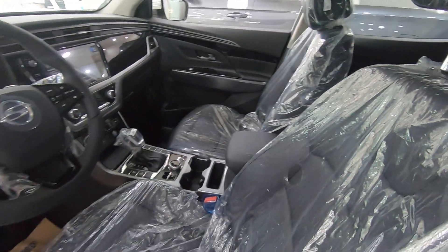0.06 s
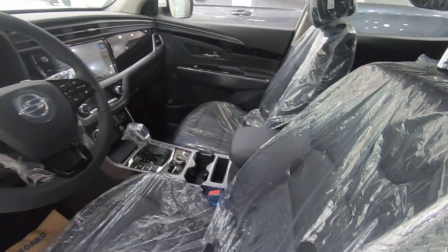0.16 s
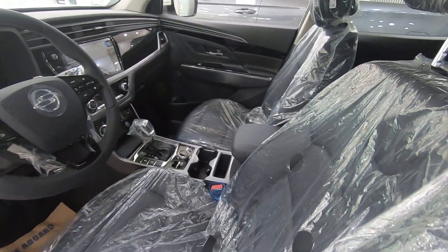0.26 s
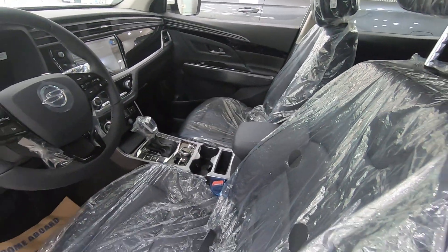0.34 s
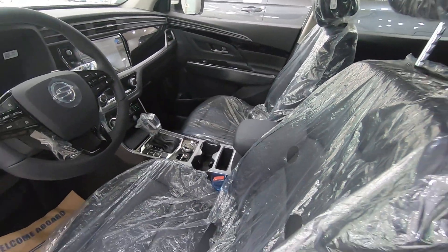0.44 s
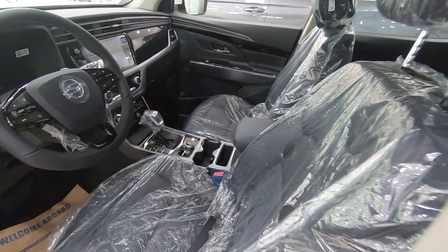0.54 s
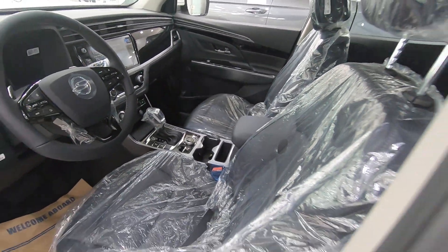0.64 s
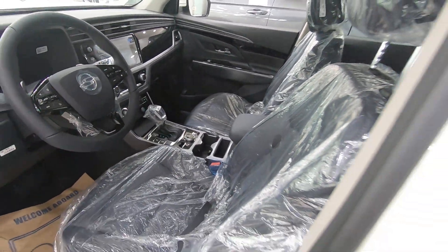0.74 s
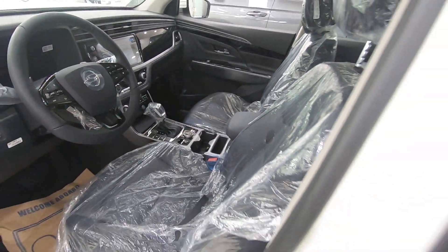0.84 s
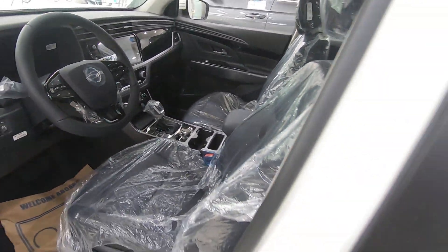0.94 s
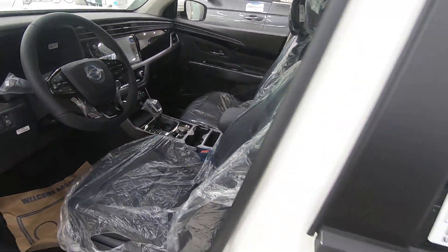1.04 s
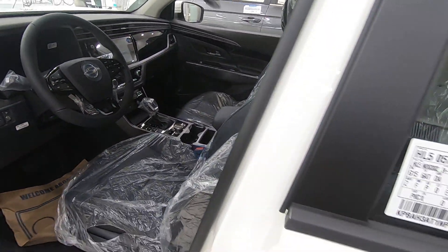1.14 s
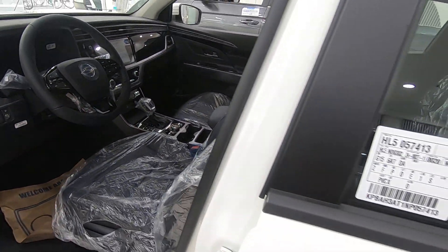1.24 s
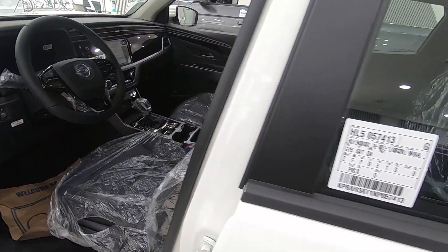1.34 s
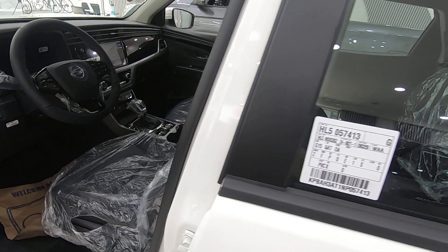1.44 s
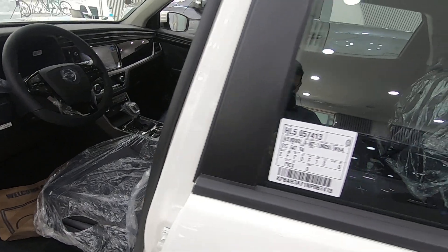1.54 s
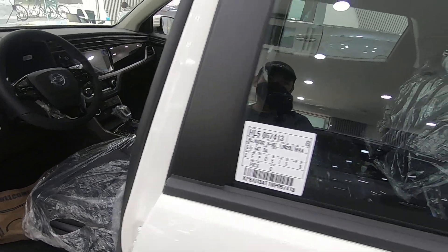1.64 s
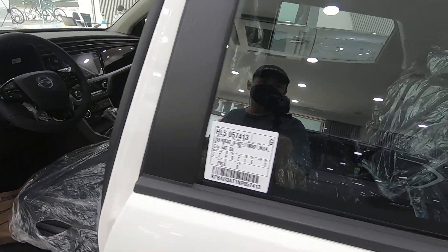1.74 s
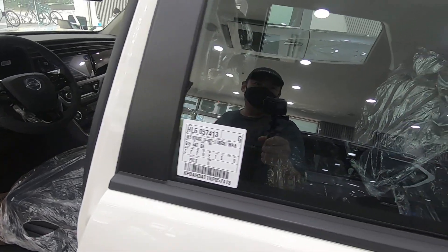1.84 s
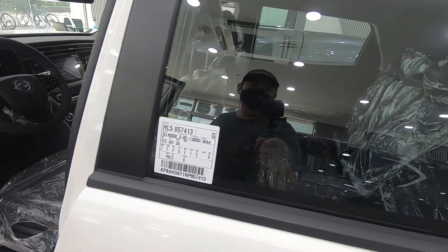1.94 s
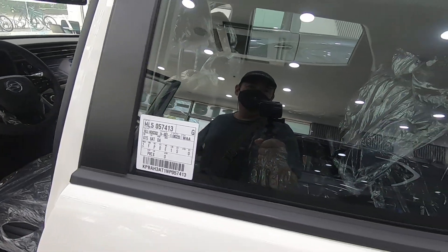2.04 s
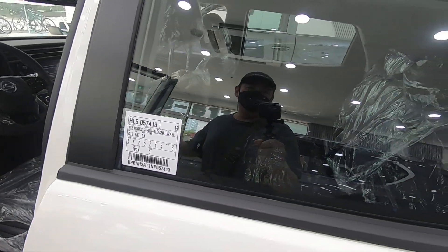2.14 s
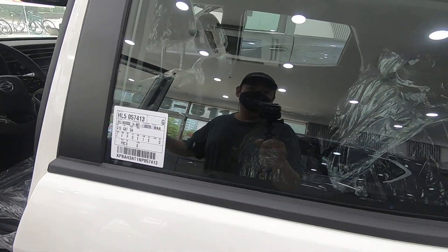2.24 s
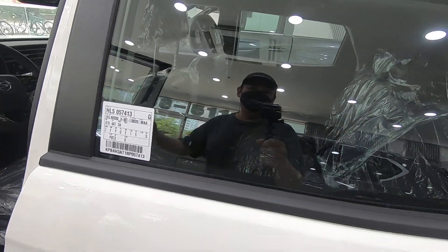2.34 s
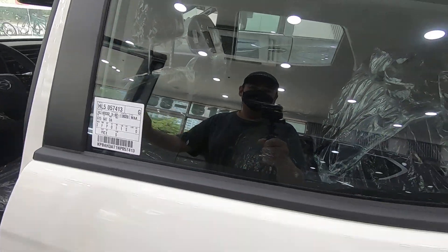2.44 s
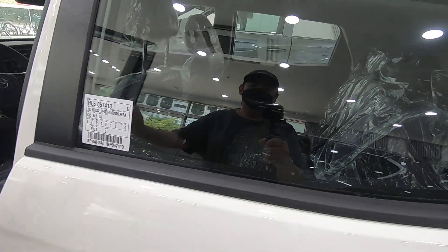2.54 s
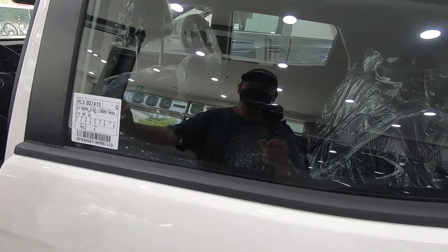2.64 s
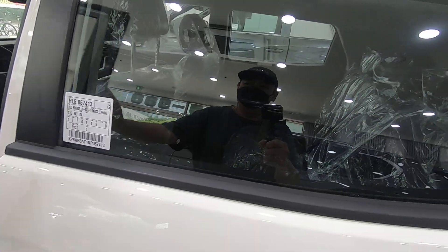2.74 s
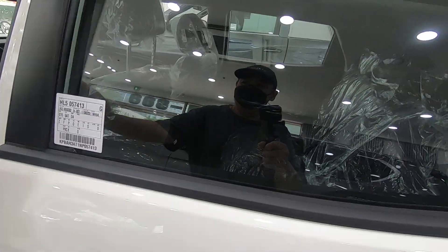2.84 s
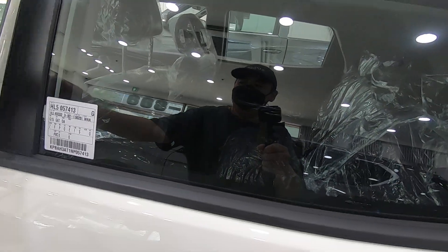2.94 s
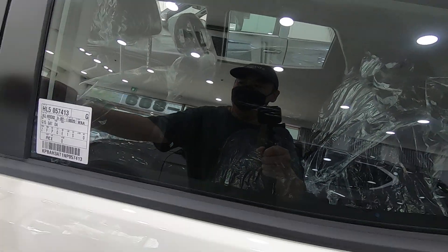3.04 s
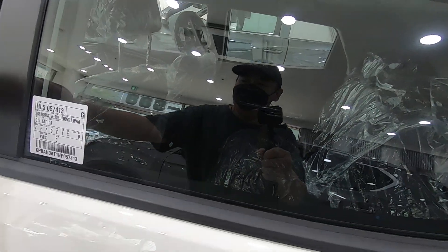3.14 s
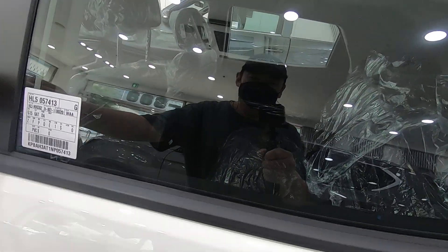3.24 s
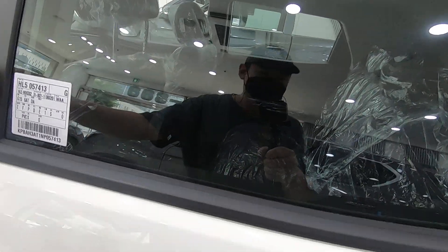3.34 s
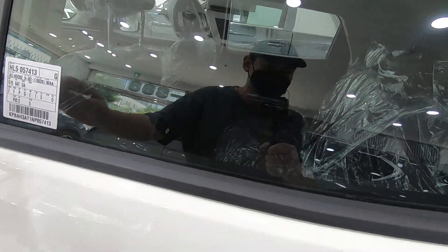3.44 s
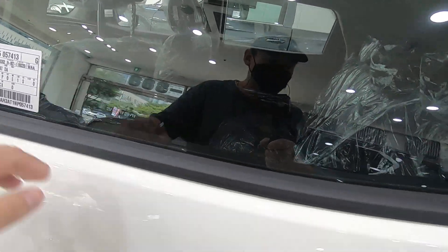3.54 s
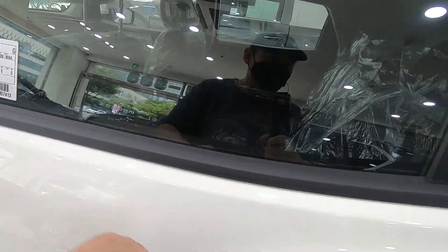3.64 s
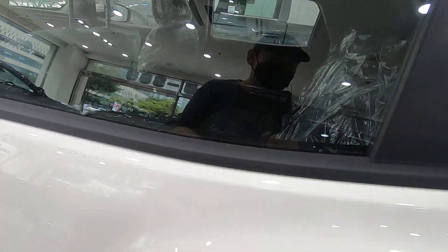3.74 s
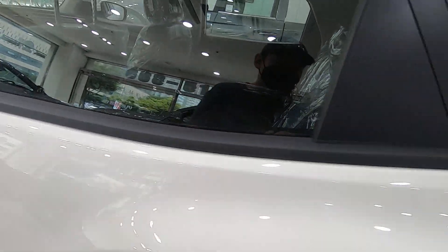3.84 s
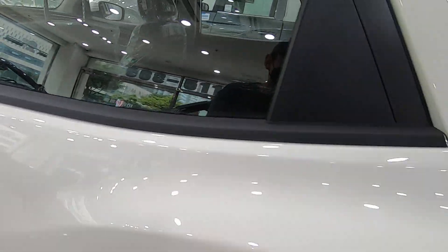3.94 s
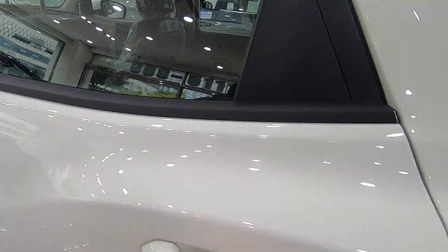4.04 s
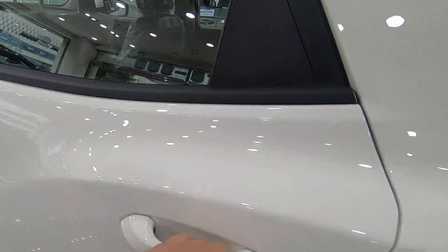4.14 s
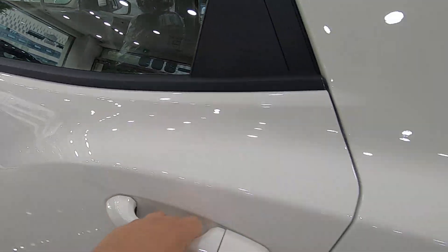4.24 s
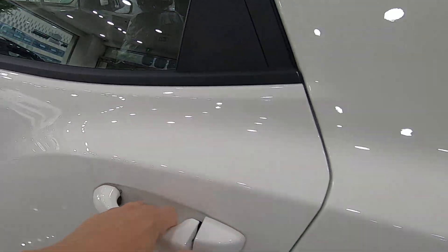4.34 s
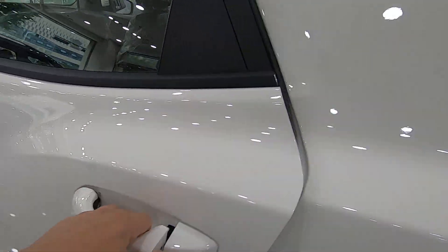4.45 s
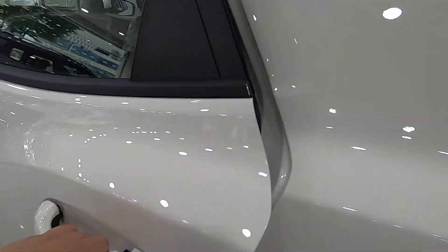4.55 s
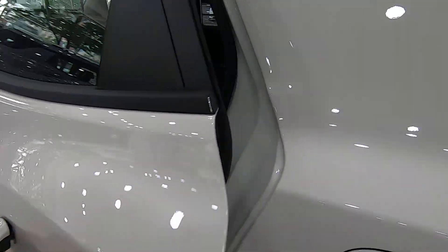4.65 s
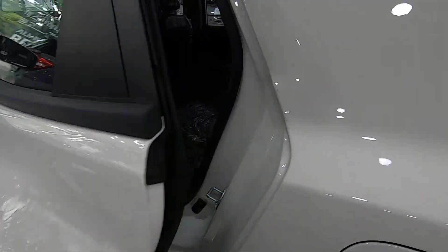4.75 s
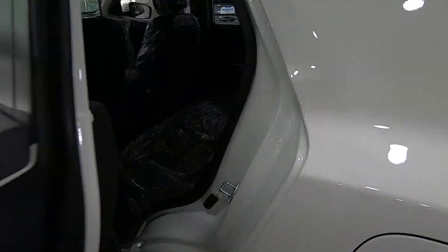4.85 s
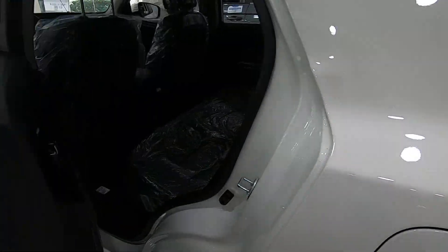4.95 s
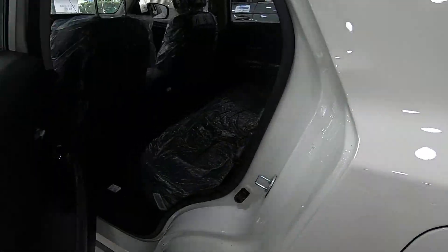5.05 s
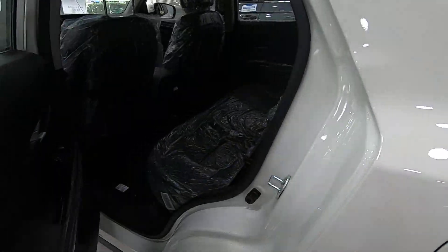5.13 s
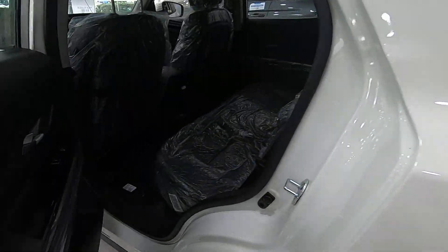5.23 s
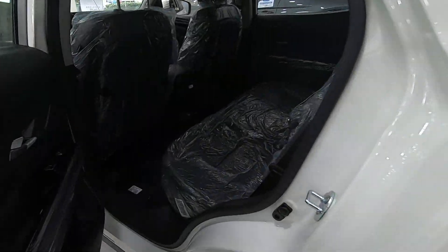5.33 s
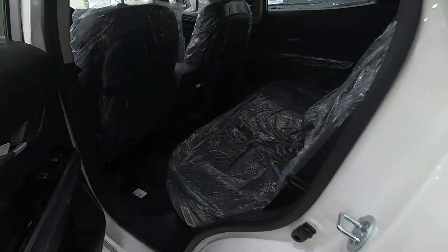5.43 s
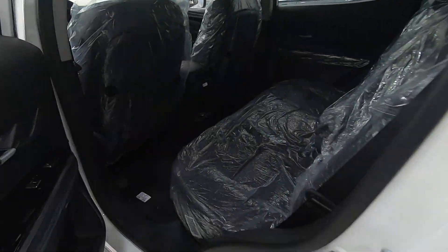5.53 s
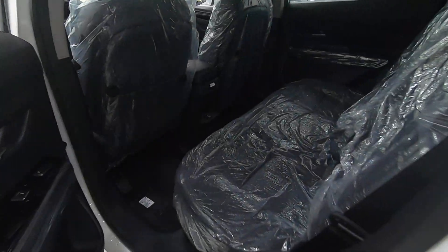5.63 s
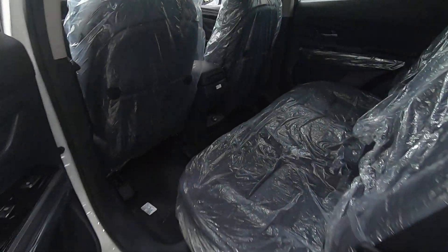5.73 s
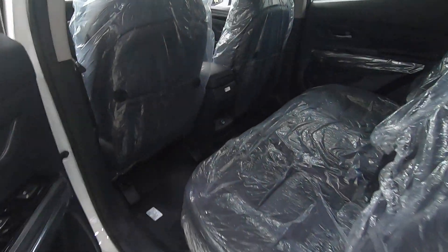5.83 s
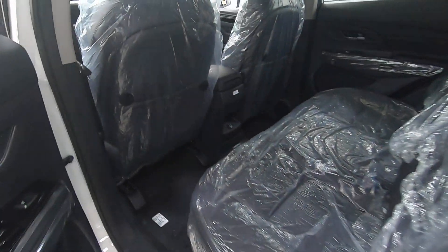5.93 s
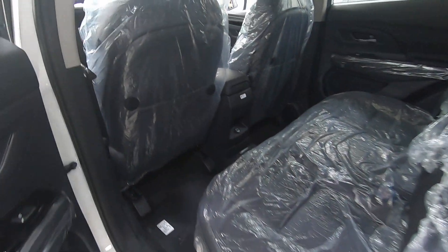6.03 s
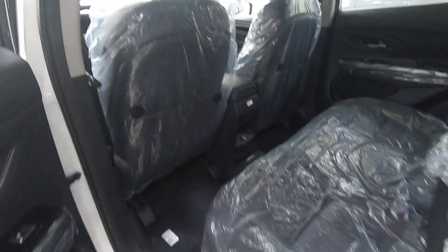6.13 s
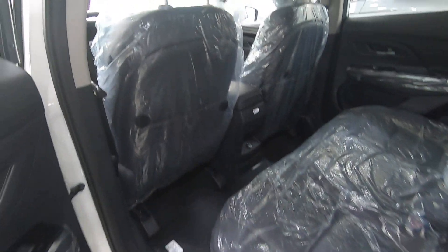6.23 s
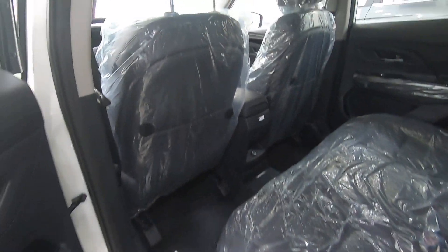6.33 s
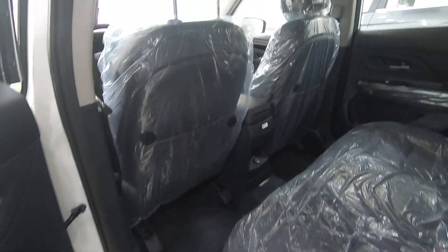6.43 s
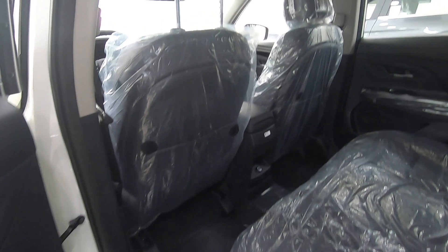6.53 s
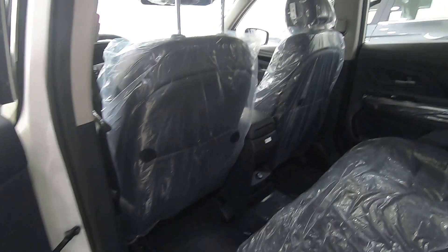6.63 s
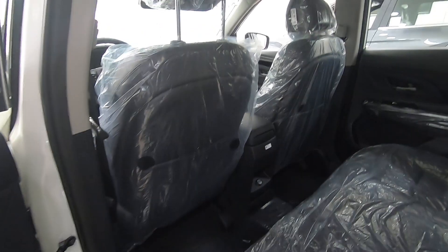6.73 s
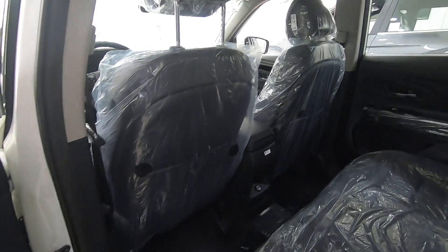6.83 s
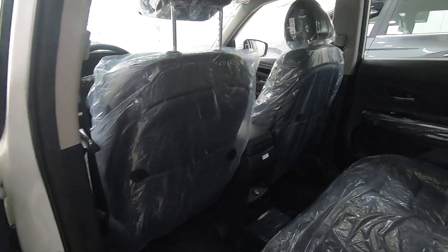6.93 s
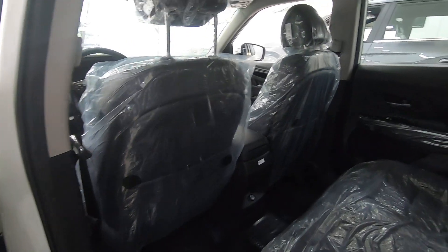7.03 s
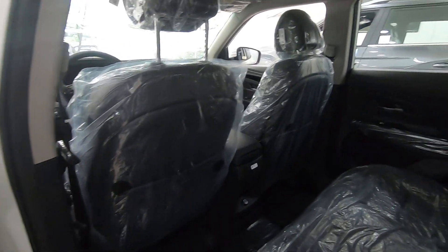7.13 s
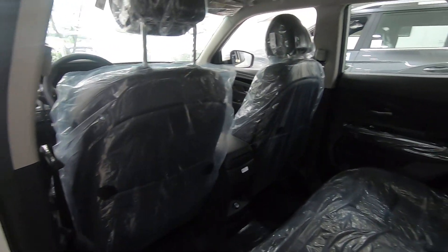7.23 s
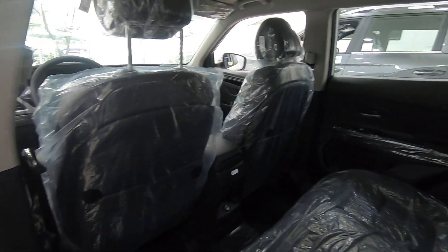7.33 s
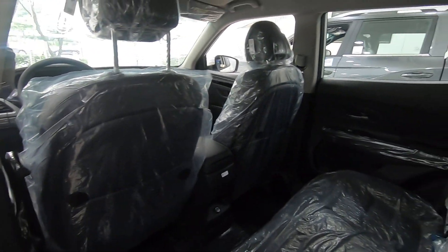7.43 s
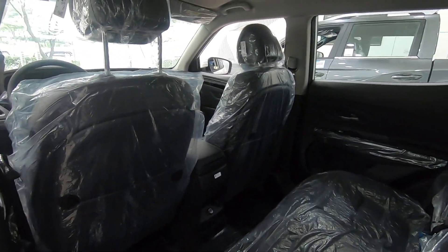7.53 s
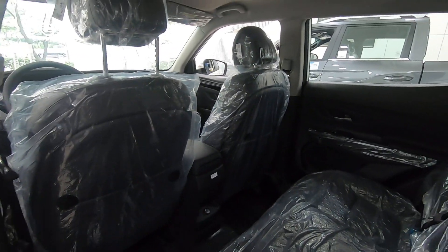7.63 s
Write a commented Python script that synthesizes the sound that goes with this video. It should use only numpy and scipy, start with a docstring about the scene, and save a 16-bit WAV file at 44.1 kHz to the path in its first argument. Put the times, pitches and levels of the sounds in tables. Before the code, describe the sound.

A vehicle passes outside, its low drone swelling and thinning beneath a soft hiss. A nearby car door is pushed closed with a deep thump, fading in the big hall. About a second later come small handle clicks and the clunk of another door opening, followed by a knock as it swings wide. A light tap on the microphone and one very faint, distant horn follow over the continuing rumble.

```python
"""Street rumble, passing traffic and a whistling hiss fill a large showroom. A car door is pushed shut;
then a handle is pulled, the latch lets go and a second door swings to its stop.
Every blow makes the door panel ring, then dies away in the hall, bass last.
Near the end a finger taps the microphone's case and a horn toots far away."""
import sys
import numpy as np
from scipy import signal
from scipy.io import wavfile

SR = 44100
rng = np.random.default_rng(int(sys.argv[2]) if len(sys.argv) > 2 else 0)


def unload_audio(sound):
    """Save the sound as a 16-bit wav file, at the path given as the first command line argument."""
    columns = np.transpose(np.atleast_2d(sound))
    # keep every value between -1 and 1, then stretch to whole-number steps
    steps = np.round(np.clip(columns, -1, 1) * 32767)
    wavfile.write(sys.argv[1], SR, steps.astype(np.int16))


N = 338732

# the tones of each door panel: f/Hz, level/dB, fade/s (a fade, or t60, is the time to drop 60 dB)
FRONT_TONES = [(27.7, -4, 0.87), (42.4, 0, 0.73), (85.6, -0.5, 0.34), (104.2, -3, 0.78), (145, -7, 0.2),
               (239, -5.5, 0.43), (388, -12.5, 0.094), (460, -9, 0.063), (511, -12.5, 0.13),
               (630, -16, 0.058), (708, -10.5, .07), (864, -4, 0.056), (1065, -4.5, 0.04),
               (1225, -21, 0.051), (1950, -12, 0.035), (2520, -23, 0.034), (3360, -10, .03)]
REAR_TONES = [(43, -0.5, 0.94), (77, -14, .3), (128.6, -0.5, 0.27), (212, -5, 0.11), (333.4, -6.5, 0.13),
              (385, -7.5, 0.11), (605, -11.5, 0.15), (700, -15, 0.075), (736, -7, 0.057), (869, -7, 0.072),
              (1000, -21, 0.07), (1216, -13, 0.075), (1854, -6.5, 0.042), (2523, -5.5, 0.037),
              (3180, -16, .03)]

def door_panel(tones, on_this_door):
    """Each blow rings the panel's tones a little differently; rubber softens the contact."""
    luck_db = 1.56 * rng.standard_normal((len(BLOWS), len(tones)))
    rings = 0
    for k, (hz, db, t60) in enumerate(tones):
        strength = on_this_door * from_db(blow_db(hz) + db + luck_db[:, k])
        rings += (-1) ** k * ring(struck(strength), hz, t60)
    return filtered(rings, 2, 5000)

# blows on the doors: t/s, thud/dB, knock/dB, crack/dB, pan/dB (plus is left)
BLOWS = [(3.121, -25, -24, -31.5, 15), (3.127, -36, -23, -30, 6), (3.132, -38, -29, -27, 6),
         (3.1352, -13, -11, -23, 6), (3.167, -26, -23, -42, 2), (3.179, -26.5, -18, -33, -6),
         (3.197, -20, -25, -34, -9), (3.226, -28.5, -34, -36, 2), (3.272, -32, -37, -44, 4),
         (4.336, -29, -28.5, -38.5, -9), (4.388, -34, -36, -40.5, -1), (4.435, -49, -31.5, -52, -6),
         (4.490, -36, -31, -33, -9), (4.501, -17.5, -21, -26.5, 0), (4.5057, -20.5, -30, -24, -6.5),
         (4.51, -24, -27, -30, -7), (4.531, -21.5, -20, -32, -5), (4.540, -26, -29, -46, -13),
         (4.681, -42, -43, -58, -3), (5.177, -32.5, -14, -37, 4), (5.186, -25, -21.5, -43, 1),
         (5.194, -22, -45, -54, -1), (5.221, -34, -28, -50, 3)]
# how much of that pan is used at each pitch: f/Hz, share
PAN_SHARE = [(100, 0.05), (300, 0.18), (700, 0.5), (1500, 0.4), (4000, 0.2), (9000, .3)]
# where boom, thud, knock, crack and tick lie: f/Hz
BLOW_HZ = [50, 200, 700, 2500, 8000]
BLOW_TIMES = np.array(BLOWS)[:, 0]
ON_REAR = BLOW_TIMES > 4   # blows after 4 s fall on the rear door
SLAM_S, SETTLE_S = 3.135, .04
SETTLED = np.clip((BLOW_TIMES - SLAM_S) / SETTLE_S, 0, 1) * ~ON_REAR   # front door only, 0 to 1

def blow_db(hz):
    """Each blow's level at one pitch; boom and tick grow as the front door settles into its seal."""
    _, thud, knock, crack, pan = np.transpose(BLOWS)
    boom = thud + np.where(ON_REAR, -6.5, -5) + 8 * SETTLED
    tick = crack + np.where(ON_REAR, -21, -23) + 3 * SETTLED
    spectra = np.transpose([boom, thud, knock, crack, tick])
    level_db = np.array([np.interp(np.log(hz), np.log(BLOW_HZ), row) for row in spectra])
    return level_db + at_hz(PAN_SHARE, hz) * pan / 2 * np.array([[1], [-1]])

def struck(sizes):
    """One click for every blow, left and right."""
    return np.array([clicks(BLOW_TIMES, side) for side in sizes])

# clicks of the handle and latch rods: t/s, level/dB, f/Hz
LATCH_CLICKS = [(4.2574, -47, 3050), (4.2846, -36, 4830), (4.2970, -36, 3280), (4.3050, -34.5, 4000),
                (4.3144, -42, 6100), (4.3440, -40, 8500), (4.3510, -31, 4300), (4.3720, -33, 3000),
                (4.3880, -41, 2900), (4.4004, -36, 3070), (4.4156, -33, 2610), (4.5310, -34, 4270),
                (4.6830, -41, 4500)]

def handle():
    """The hand meets the handle with a ping; then hard parts click, each with a ring, tap and snap."""
    times, level_db, ring_hz = np.transpose(LATCH_CLICKS)
    ping = ring(clicks([4.160], from_db(-51)), hz=3420, t60=.07)
    rings = sum(ring(clicks([t], from_db(db + 1)), hz, t60=.004) for t, db, hz in LATCH_CLICKS)
    taps = filtered(clicks(times, from_db(level_db + 10)), 3, [2200, 8000], "band")
    snap_db = level_db - 34 + 15 * np.log2(ring_hz / 3500)   # higher clicks snap harder
    snaps = ring(clicks(times, from_db(snap_db)), hz=13800, t60=.003)
    return ping + filtered(rings + taps, 4, 10500) + snaps

def seal_pop(start_s=4.4932, hz=165):
    """Air pops as the rubber seal parts: about one cycle, push then pull."""
    cycles = np.maximum(np.arange(N) / SR - start_s, 0) * hz
    swell = np.sin(np.pi * np.minimum(cycles / 1.21, 1))
    return from_db(-5) * swell * np.sin(2 * np.pi * cycles)

# the rattle where door and frame meet: f/Hz, level/dB (next to the blow), fade/s
RATTLE = [(200, -8, 0.078), (695, -10.5, 0.036), (2500, -7.5, 0.046), (8000, -7, 0.063), (14000, -24, .03)]

def rattle(hz):
    """Energy at one pitch as the contact rattles briefly after each blow."""
    return dying(blow_db(hz) + at_hz(RATTLE, hz), rise_s=.001, t60=at_hz(RATTLE, hz, column=2))

# the hall's echo: f/Hz, level/dB (next to what the hall gets), rise/s, fade/s
HALL = [(30, -13, 0.022, 0.57), (102, -7.5, 0.0072, 0.84), (300, -16, 0.016, 0.43), (980, -23, 0.029, 0.78),
        (3020, -19.5, 0.0061, 0.77), (8000, -18.5, .03, 0.62), (14000, -35, .02, .4)]

def hall_echo(hz):
    """Energy at one pitch coming back from the hall; there is more once the front door has settled."""
    sent_db = blow_db(hz) + np.where(ON_REAR, -6, -2.5) + 3.5 * SETTLED
    return dying(sent_db + at_hz(HALL, hz), at_hz(HALL, hz, column=2), at_hz(HALL, hz, column=3))

def dying(levels_db, rise_s, t60):
    """Energy that builds up after each blow, then fades."""
    fall = 10 ** (-6 / (t60 * SR))
    rise = np.exp(-1 / (rise_s * SR))
    return signal.lfilter([1 - rise], np.convolve([1, -fall], [1, -rise]), struck(from_db(2 * levels_db)))

def door_tails(bands):
    """Rattle and echo set the loudness of each band of noise."""
    tails = 0
    for hz, band in bands:
        noise = rms_one(np.roll(band, N // 2, axis=1))   # shifted so it is unlike the background
        tails += np.sqrt(np.abs(rattle(hz) + hall_echo(hz))) * noise
    return tails

# the tones of the microphone's case: f/Hz, level/dB, fade/s
CASE_TONES = [(60, -24, .06), (250, -30, 0.037), (1230, -28, .04), (2300, -40, .008)]

def case_tap(start_s=6.204):
    """A finger taps the microphone's case, which pushes the left side and pulls the right."""
    tap = sum(ring(clicks([start_s], from_db(db)), hz, t60) for hz, db, t60 in CASE_TONES)
    return tap * np.array([[1], [-.7]])

# the horn's overtones: multiple of the base pitch, level/dB
HORN_TONES = [(2, -60), (3, -62), (4, -62), (5, -66)]

def horn(start_s=7.06, end_s=7.2, base_hz=432):
    """A far horn: steady overtones, switched on and left to fade in the street."""
    t = np.arange(N) / SR
    on = signal.lfilter([.001], [1, -.999], (t > start_s) & (t < end_s))
    return on * sum(from_db(db) * np.sin(2 * np.pi * k * base_hz * t + k) for k, db in HORN_TONES)

# traffic swells past outside and thins out: t/s, drone/dB, roar/dB
TRAFFIC = [(0.0, -41.5, -52.5), (0.41, -37.5, -46.5), (0.8, -34.5, -44.5), (1.39, -37.5, -44.5),
           (2.0, -37, -46.5), (2.7, -40.5, -48.5), (4.3, -41, -50), (5.0, -42.5, -50), (5.7, -42, -53),
           (6.6, -43.5, -54), (7.68, -46.5, -53.5)]
# the lumpy deep rumble and the hiss rise and fall: t/s, level/dB
RUMBLE_LEVEL = [(0.0, -30.5), (0.15, -44), (0.68, -42.5), (0.85, -34), (1.11, -32), (1.39, -35.5),
                (1.92, -32), (2.54, -39), (3.12, -38), (3.31, -29), (3.45, -41), (3.9, -39.5),
                (4.25, -33.5), (4.6, -40), (5.37, -39.5), (5.65, -33.5), (5.86, -40), (6.65, -42.5),
                (7.21, -39), (7.68, -37.5)]
HISS_LEVEL = [(0.0, -59), (0.15, -66), (0.41, -67), (1.5, -66), (2.8, -60), (4.0, -60.5), (4.25, -56),
              (4.68, -60), (5.25, -58), (6.0, -61), (7.68, -60.5)]

def street_levels():
    """Loudness in dB of rumble, drone, roar, wash and hiss; the wash partly follows the roar."""
    drone_db, roar_db = in_time(TRAFFIC)
    wash_db = -51.5 + 0.59 * (roar_db - roar_db.mean())
    push_db = bump(3.18, db=7.5, in_s=0.47, out_s=.18)   # the closing door pushes air ahead of it
    return [*in_time(RUMBLE_LEVEL), drone_db + push_db, roar_db, wash_db, *in_time(HISS_LEVEL)]

# the tone colour of five noises of traffic and air, low to high: f/Hz, relative level/dB
RUMBLE = [(8.8, -38), (15, -7), (27, 0.5), (43, 8), (57, 4), (90, -17), (120, -34), (200, -120)]
DRONE = [(50, -14.5), (85, 0.5), (199, -3.5), (221, -4), (296, -10), (333, -23.5), (370, -18.5), (480, -79),
         (810, -120)]
ROAR = [(200, -31), (340, -1.5), (409, 1), (497, -5), (579, -4), (706, -12), (760, -9), (990, -27),
        (1670, -120)]
WASH = [(440, -52), (740, -6), (1070, -0.5), (1420, -6.5), (1980, -6), (2420, -13.5), (2780, -11.5),
        (4500, -23), (5850, -41), (9900, -120)]
HISS = [(1760, -11), (3000, -21), (4090, -17), (5490, 18.5), (5840, 1.5), (6170, 0), (6930, 3.5),
        (9310, -1.5), (11500, -25), (14400, -30), (15500, -40)]
# the street leans a little to the right: t/s, left minus right/dB
STREET_PAN = [(0.0, -0.1), (3.0, -0.6), (4.5, -0.8), (7.68, -0.4)]

def street(bands, gains):
    """Traffic and air: five colours of noise, each band wavering a little."""
    layers = 0
    for hz, band in bands:
        colour = from_db([at_hz(spectrum, hz) for spectrum in (RUMBLE, DRONE, ROAR, WASH, HISS)])
        layers += colour[:, None, None] * from_db(0.98 * drift(3.7)) * band
    pan = from_db(in_time(STREET_PAN)[0] / 2 * [[1], [-1]])
    return pan * sum(gain * rms_one(layer) for gain, layer in zip(gains, layers))

# whistles in the hiss: f/Hz, width/Hz, relative level/dB
WHISTLES = [(5550, 120, -2.5), (6203, 210, -1.5), (8220, 1100, -3), (9270, 310, -5.5)]

def background(bands):
    """Street, whistles and a thin whine; all sink briefly after the slam and come back."""
    dip_db = bump(3.63, db=-5, in_s=0.5, out_s=0.55)
    gains = from_db(street_levels() + dip_db)
    traffic = street(bands, gains)
    hiss_gain = gains[4]
    whistles = hiss_gain * from_db(-6.5) * sum(whistle(*row) for row in WHISTLES)
    whine = from_db(dip_db) * whistle(hz=2760, width_hz=59, db=-67)
    return traffic + whistles + whine

def whistle(hz, width_hz, db):
    """A wavering whistle: noise passed twice through one narrow resonance."""
    noise = rng.standard_normal((3, N))
    stereo = noise[0] + noise[1:]   # one part shared, one part for each side
    t60 = np.log(1000) / (np.pi * width_hz)
    return from_db(db + 0.92 * drift(4.5)) * rms_one(ring(ring(stereo, hz, t60), hz, t60))

# how wide the noise sounds: f/Hz, side minus middle/dB
NOISE_WIDTH = [(60, -16.5), (100, -22), (180, -26.5), (310, -20), (550, -9.5), (950, -2.5), (1650, -2.5),
               (2860, -8), (4970, -1.5), (8640, 4), (15000, -1)]

def noise_bands():
    """Stereo noise cut into bands a third of an octave wide, more spread out in the treble."""
    edges = 16 * 2 ** np.arange(0, 10.1, 1 / 3)
    white = rng.standard_normal((2, 2, N))
    for k, (low, high) in enumerate(zip(edges, edges[1:])):
        mid, side = filtered(white[k % 2], 2, [low, high], "band")
        hz = np.sqrt(low * high)
        yield hz, mid + from_db(at_hz(NOISE_WIDTH, hz)) * side * [[1], [-1]]

def self_noise():
    """The microphone's own faint, high hiss, separate on each side."""
    return from_db(-82) * rms_one(filtered(rng.standard_normal((2, N)), 4, 10500, "high"))

def from_db(db):
    """Turn decibels into a gain."""
    return 10 ** (np.asarray(db) / 20)

def rms_one(x):
    """Scale a signal to an average power of 1."""
    return x / np.sqrt(np.mean(x ** 2) + 1e-20)

def filtered(x, order, hz, kind="low"):
    """Keep the lows, the highs or a band; a higher order cuts more steeply."""
    return signal.sosfilt(signal.butter(order, hz, kind, fs=SR, output="sos"), x)

def at_hz(points, hz, column=1):
    """Read between a table's rows at one pitch."""
    return np.interp(np.log(hz), np.log(np.array(points)[:, 0]), np.array(points)[:, column])

def in_time(rows):
    """Read each column of a time table at every sample."""
    times, *columns = np.transpose(rows)
    return [np.interp(np.arange(N) / SR, times, column) for column in columns]

def bump(at_s, db, in_s, out_s):
    """A level change that ramps in before at_s and out after it."""
    return np.interp(np.arange(N) / SR, [at_s - in_s, at_s, at_s + out_s], [0, db, 0])

def drift(rate_hz):
    """A slow random wobble, about 1 in size."""
    r = np.exp(-80 * np.pi * rate_hz / SR)
    slow = signal.lfilter([1], [1, -2 * r, r * r], rng.standard_normal(N // 40 + 2002))[2000:]
    return np.interp(np.arange(N) / 40, np.arange(len(slow)), rms_one(slow))

def clicks(times, sizes):
    """Clicks one sample long, at times in seconds."""
    out = np.full(N, 1e-18)
    np.add.at(out, np.round(np.asarray(times) * SR).astype(int), sizes)
    return out

def ring(x, hz, t60):
    """A resonance: each click starts a fading tone of the same height."""
    r, w = from_db(-60 / (t60 * SR)), 2 * np.pi * hz / SR
    return signal.lfilter([0, np.sin(w)], [1, -2 * r * np.cos(w), r * r], x)

def scene():
    """Doors close by, hall and street all round."""
    doors = door_panel(FRONT_TONES, ~ON_REAR) + door_panel(REAR_TONES, ON_REAR)
    latch = (handle() + seal_pop()) * from_db([[-.8], [.8]])
    toot = horn() * from_db([[3], [-3]])
    bands = list(noise_bands())
    return doors + latch + door_tails(bands) + case_tap() + toot + background(bands)

# the stereo picture closes to the middle and opens again: t/s, how closed (0 open, about 1 shut)
NARROWING = [(0, 0.001), (.25, 0.18), (.5, 0.5), (.8, .92), (1.35, 1.01), (1.5, 0.41), (2.05, 0.15),
             (2.3, 0.07), (3.2, 0.01), (7.68, 0.001)]
# the bass widens for a moment: t/s, boost/dB, half length/s
BASS_SPREADS = [(0.0, 25, 0.95), (5.3, 13, .3)]

def record(dry):
    """Change the stereo width in three bands, add faint hiss, round the peaks and cut the very top."""
    mid, side = (dry[0] + dry[1]) / 2, (dry[0] - dry[1]) / 2
    bass = signal.sosfiltfilt(signal.butter(2, 200, fs=SR, output="sos"), side)
    treble = signal.sosfiltfilt(signal.butter(2, 5000, "high", fs=SR, output="sos"), side)
    closed, = in_time(NARROWING)
    spread = from_db(sum(bump(s, db, half, half) for s, db, half in BASS_SPREADS))
    side = (from_db(-61 * closed ** 0.67) * spread * bass   # the bass shuts first and opens last
            + from_db(-52 * closed ** 0.89) * (side - bass - treble)
            + from_db(-21.5 * closed ** 1.2) * treble)
    stereo = np.array([mid + side, mid - side]) + self_noise()
    rounded = 1.228 * np.tanh(stereo / 1.173)
    return signal.sosfilt(signal.cheby2(12, 70, 16000, fs=SR, output="sos"), rounded)

dry = scene()
out = record(dry)
unload_audio(out)
```